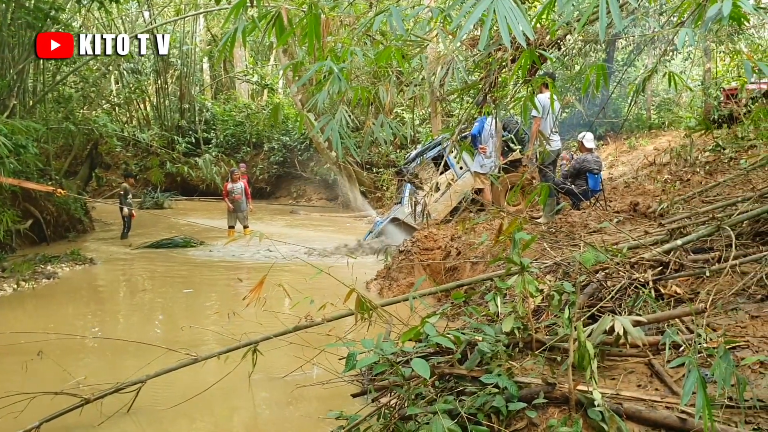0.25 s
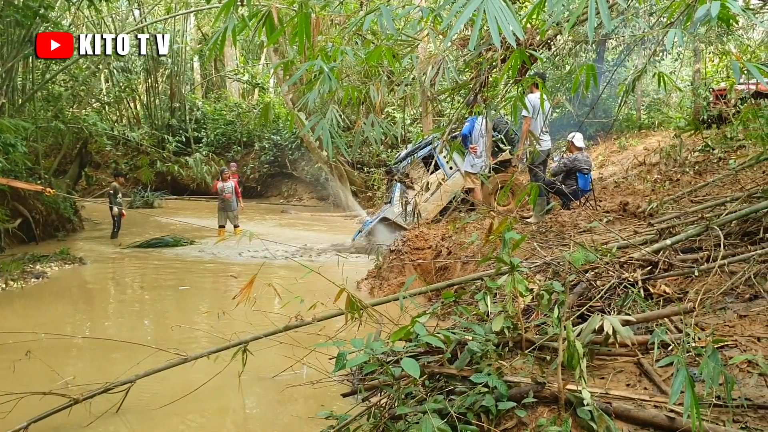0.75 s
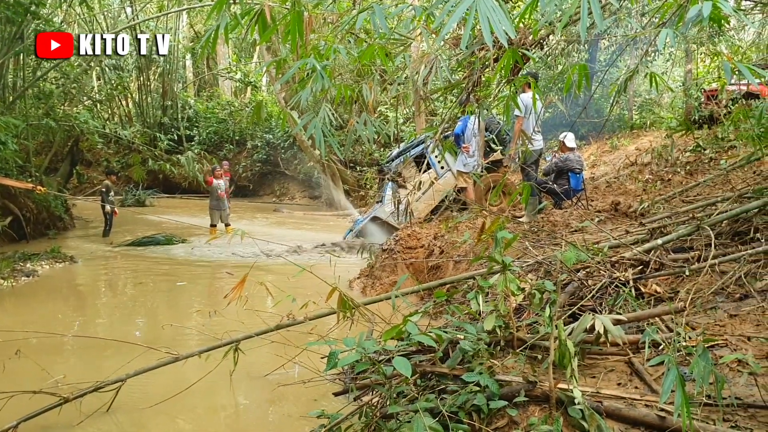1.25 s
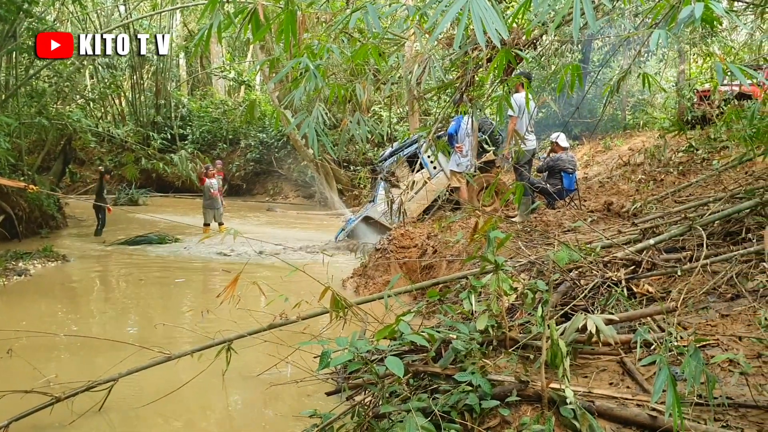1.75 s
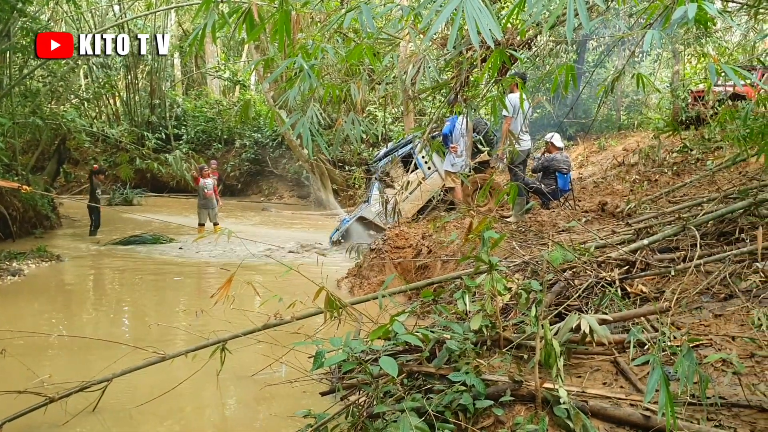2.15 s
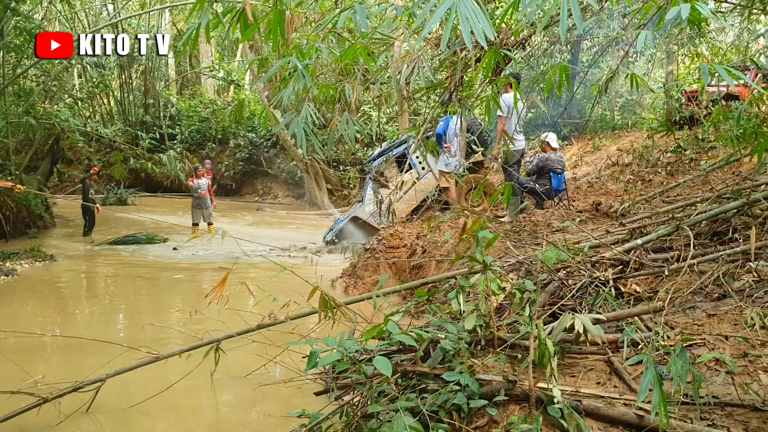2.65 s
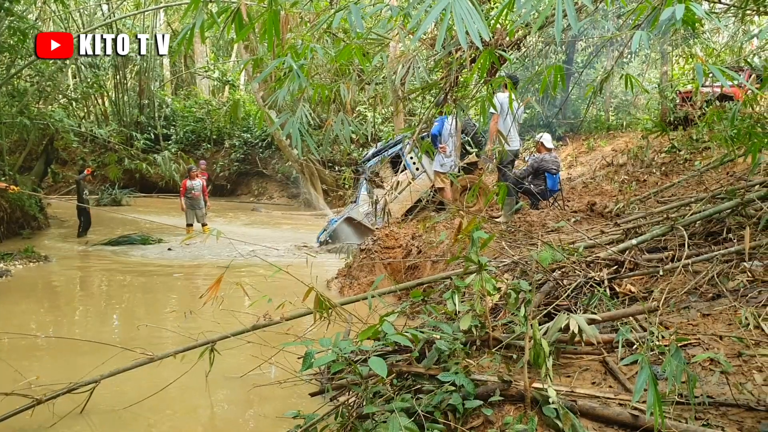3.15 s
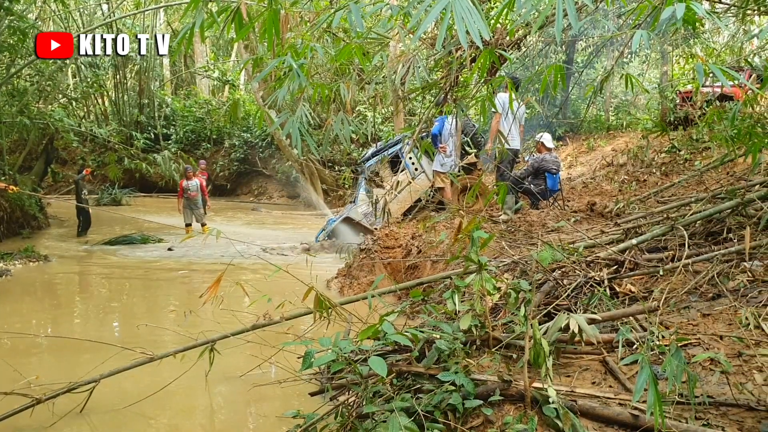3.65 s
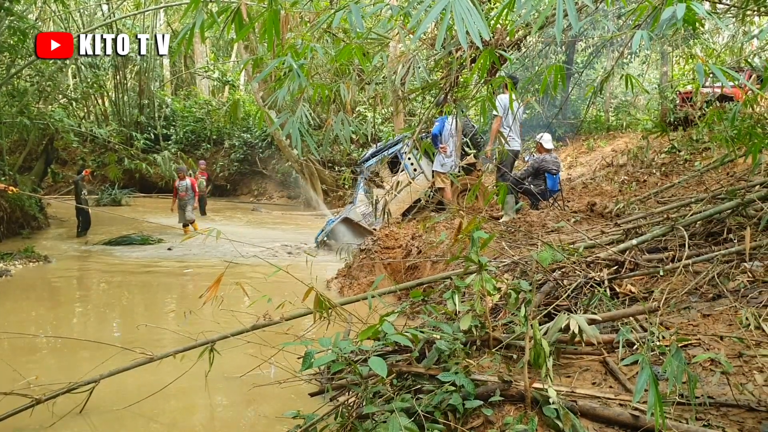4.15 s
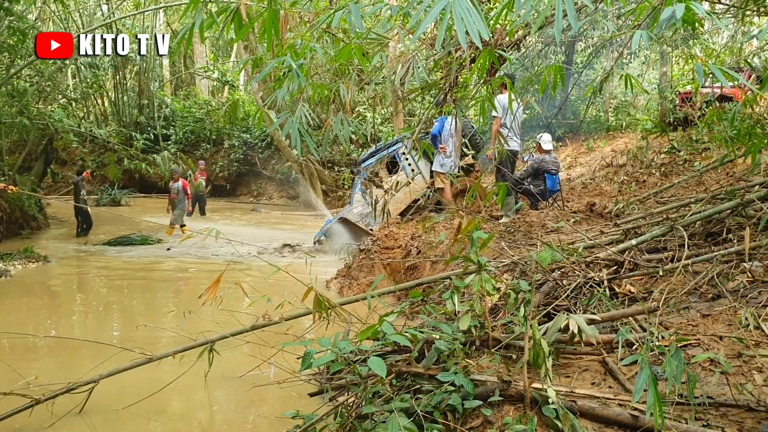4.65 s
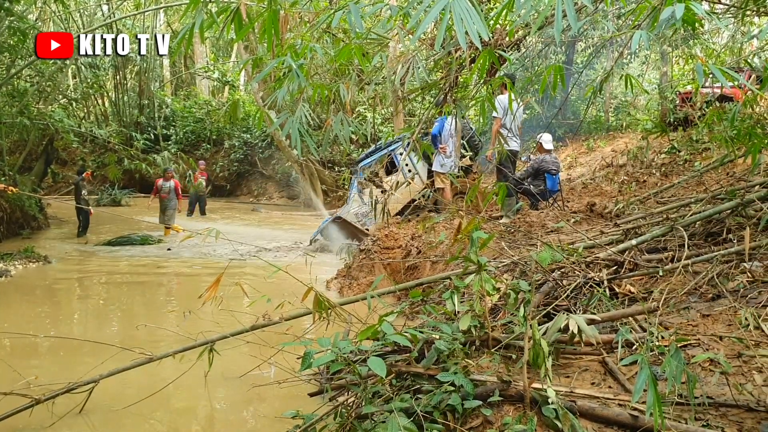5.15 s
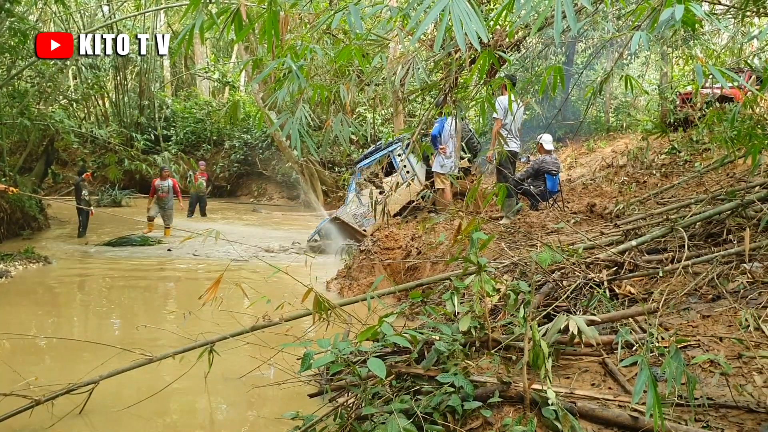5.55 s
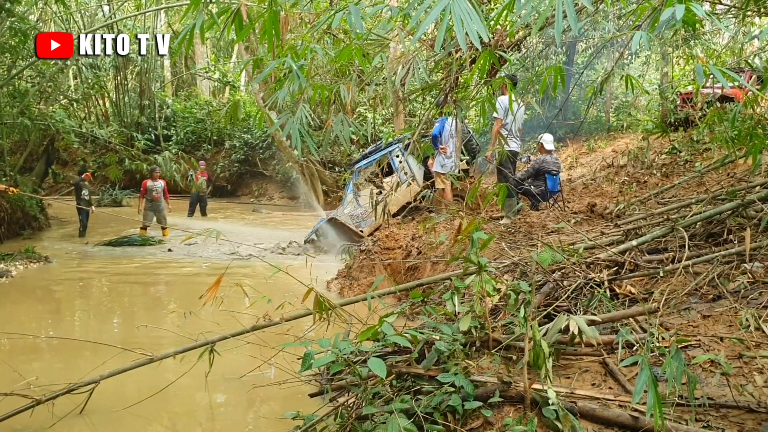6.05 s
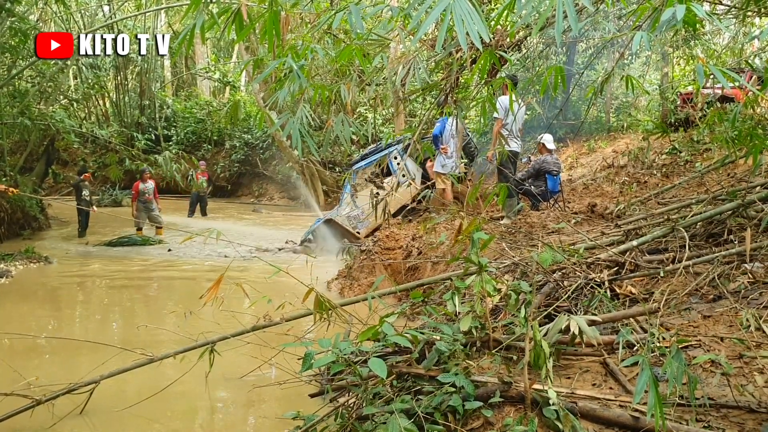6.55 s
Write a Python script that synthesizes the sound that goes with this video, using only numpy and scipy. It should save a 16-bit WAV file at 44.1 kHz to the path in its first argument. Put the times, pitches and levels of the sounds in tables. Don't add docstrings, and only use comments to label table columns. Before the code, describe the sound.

A four-cylinder diesel off-roader labours at high revs on a muddy bank, sags mid-way and recovers, wheels hissing spray into water.

```python
import sys
import numpy as np
from scipy import signal
from scipy.fft import rfft, irfft
from scipy.io import wavfile
from scipy.ndimage import uniform_filter1d, map_coordinates

SR = 44100
rng = np.random.default_rng(int(sys.argv[2]) if len(sys.argv) > 2 else 0)


def to_wav(s):
    ch = np.atleast_2d(s).T
    pcm = np.round(np.clip(ch, -1, 1) * 32767)
    wavfile.write(sys.argv[1], SR, pcm.astype(np.int16))


def rack_gain(trim_db):
    fader = np.asarray(trim_db, float)
    return 10 ** (fader / 20)


N = 299880


def curve(table):
    s, value = np.transpose(table)
    return np.interp(np.arange(N) / SR, s, value)


def at(table, hz):
    f, v = np.transpose(table)
    return np.interp(np.log(np.maximum(hz, 1)), np.log(np.maximum(f, 1)), v)


def walk(rate):
    hold = int(SR / rate)
    steps = np.repeat(rng.standard_normal(N // hold + 1), hold)
    return 1.29 * uniform_filter1d(uniform_filter1d(steps, hold), hold)[:N]


def per_firing(values, cycles):
    return map_coordinates(values, [cycles], order=2, mode="wrap")


def resonance_db(hz, modes):
    return sum(db / (1 + (2 * (hz - centre) / width) ** 2) for centre, width, db in modes)


def coloured(grains, spectrum, band, flicker_db, rate, modes=()):
    # (frequency [Hz], correlation)
    likeness = [(30, .96), (125, .99), (250, .8), (500, .86), (1000, .05), (4000, .15), (12000, -.1)]
    # (frequency [Hz], level [dB])
    tilt = [(30, 0), (60, -2.5), (400, 2.5), (1290, -0.5), (2380, 0), (4400, -4), (8120, -2.5), (15000, -1)]
    hz = np.fft.rfftfreq(N, 1 / SR)
    like = np.clip(at(likeness, hz), -1, 1)
    colour_db = at(spectrum, hz) + resonance_db(hz, modes)
    mid, side = rfft(grains) * rack_gain(colour_db) * np.sqrt([1 + like, 1 - like])
    pair = np.array([mid + side, mid - side]) * rack_gain(np.outer([.5, -.5], at(tilt, hz)))
    inside = (hz > band[0]) & (hz < band[1])
    pair /= np.sqrt(2 * np.sum(abs(mid[inside]) ** 2)) / N
    place = 2 * np.log2(np.maximum(hz, 1) / 30)
    noise = np.zeros((2, N))
    for k in range(19):
        overlap = np.clip(1 - abs(place - k), 0, 1)
        noise += irfft(pair * overlap, N) * rack_gain(flicker_db * walk(rate))
    return noise


def river():
    # (frequency [Hz], density [dB per Hz])
    patter = [(500, -6.5), (1200, -2.5), (2000, -20), (2750, -4.5), (3500, -8), (6000, -17), (9000, -26)]
    grains = rng.standard_normal((2, N))
    return rack_gain(-47.5) * coloured(grains, patter, (2200, 3500), flicker_db=0.92, rate=3.85)


def spray(cycles, db):
    # (frequency [Hz], density [dB per Hz])
    hiss = [(700, -5), (1200, -7), (1900, -3.5), (2700, -5), (3600, -10), (6500, -13), (7800, -17.5),
            (12000, -20), (15600, -27.5)]
    size = rack_gain(1.6 * np.minimum(rng.exponential(size=(2, N)), 6))
    pulse = 1 + 0.17 * np.cos(2 * np.pi * cycles + 0.94)
    grains = pulse * size * rng.standard_normal((2, N))
    return rack_gain(db - 3.5) * coloured(grains, hiss, (5000, 14000), flicker_db=0.63, rate=12)


def roar(cycles, db, rumble_db):
    # (frequency [Hz], density [dB per Hz])
    gas_spectrum = [(20, -53), (35, -28), (60, -17), (100, -16), (150, -19.5), (250, -17.5), (400, -21.5),
                    (700, -23.5), (1100, -22), (1700, -31), (2300, -40.5), (4500, -35.5), (7000, -43.5),
                    (9000, -73)]
    # (frequency [Hz], width [Hz], height [dB])
    body_modes = [(717, 37, 4), (1160, 130, 2.5), (1450, 67, 6), (1650, 53, 7.5), (1875, 190, 9),
                  (2240, 80, -6)]
    puff = np.exp(-(cycles % 1) / .4)
    pulse = 1 + 0.65 * puff + 0.087 * np.cos(np.pi * cycles) + 0.023 * np.cos(np.pi * cycles / 2)
    grains = pulse * rng.standard_normal((2, N))
    gas = coloured(grains, gas_spectrum, (800, 2200), flicker_db=0.98, rate=6, modes=body_modes)
    bass = signal.sosfiltfilt(signal.butter(2, 380, fs=SR, output="sos"), gas)
    return rack_gain(db - 6.0) * (gas + (rack_gain(rumble_db) - 1) * bass)


def block(cycles, crank_db, rings_db):
    # (multiple of the firing rate, level [dB])
    crank_tones = [(.5, -44), (1.5, 0), (2.5, -1.5), (3.5, -8), (4.5, -12), (5.5, -13), (6.5, -14.5)]
    turn = 2 * np.pi * cycles
    crank = sum(rack_gain(crank_db + db + 3 * walk(5)) * np.sin(k * turn) for k, db in crank_tones)
    ring = np.zeros(N)
    for k, db in enumerate(rings_db, 6):
        ring += rack_gain(db + 1.5 * walk(9)) * np.sin(k * turn + .8 * walk(10))
    return np.sqrt(2) * (crank + rack_gain(1.0) * ring)


def pipe(hz, load_db, climb, multiple):
    # (frequency [Hz], width [Hz], height
    # [dB])
    tone_modes = [(82.2, 3.89, -2.5), (98.9, 21.7, 13), (163.4, 19.95, -11.5), (173.1, 46.6, 20.5),
                  (206.9, 23, 15), (229.5, 7.1, 3.5), (257.2, 12.7, 10), (268, 4.7, -5.5),
                  (306.6, 39, 18.5), (337.7, 5.6, -11), (350.8, 19.2, 11.5), (370.14, 16.3, 10.5),
                  (401, 23, 20), (447, 37, 13.5),
                  (528, 12, 12.5), (569, 13, 18), (591, 18.6, 21), (606, 6, 8), (714.5, 53, 19.5),
                   (779, 14, 15.5), (807, 14, 13), (838, 8, 24)]
    # (load [dB per dB], climbing revs [dB per Hz/s])
    answer = [(1.19, 0.06), (2, 0.07), (0.27, 0.1251), (1.13, 0.2278), (3, 0.1445), (2.5, 0.027)]
    tone_hz = multiple * hz
    slope_db = -25 - 12 * np.log2(tone_hz / 100)
    per_load, per_climb = answer[min(multiple, len(answer)) - 1]
    driver_db = per_load * load_db + per_climb * climb
    return slope_db + resonance_db(tone_hz, tone_modes) + driver_db


def exhaust(cycles, hz, tones_db, roar_db, uneven):
    cylinders = [.9, .35, -1.2, -.05]
    # (firing rate [Hz], phase [rad])
    slant = [(75, 1), (89, .6), (94, .8), (97, 1.6), (102, 2.5)]
    # (frequency [Hz], level against the roar [dB])
    upper_tones = [(500, -21), (720, -21), (1000, -23), (1420, -20), (1900, -25)]
    count = int(cycles[-1]) + 8
    strength_scatter, timing_scatter = rng.standard_normal((count, 2)).T
    strength = per_firing(np.resize(cylinders, count), cycles) + .6 * per_firing(strength_scatter, cycles)
    angle = 2 * np.pi * (cycles + 0.018 * uneven * per_firing(timing_scatter, cycles))
    lead = at(slant, hz)
    low = sum(rack_gain(db) * np.sin(k * angle + lead * (k - 1)) for k, db in enumerate(tones_db, 1))
    high = np.zeros(N)
    for k in range(6, 19):
        level_db = roar_db + at(upper_tones, k * hz) + 3.5 * walk(6)
        high += rack_gain(level_db) * np.sin(k * angle + 2.5 * walk(9))
    return np.sqrt(2) * (1 + uneven * strength) * (low + high)


def inertia(v):
    return uniform_filter1d(v, size=SR // 10, mode="nearest")


def scene():
    # (time [s], firing rate [Hz])
    revs = [(0, 103.3), (.44, 103.2), (.95, 102.2), (1.25, 97.5), (1.56, 98.7), (1.77, 95.65),
            (2.23, 85.95), (2.52, 75.84), (2.7, 77.2), (3.06, 86.37), (3.35, 91.85), (3.9, 85.67),
            (4.35, 90.33), (4.72, 90.5), (5.22, 86.85), (5.71, 86.62), (6.23, 92.4), (6.8, 94.14)]
    # (time [s], engine load against full [dB])
    load = [(0.0, -0.76), (0.68, -1.2), (0.93, -0.7), (1.11, -4.5), (1.34, -2.5), (2.07, -4.5),
            (2.41, -6.5), (2.56, -7.5), (2.93, -1), (3.25, -0.6), (3.7, -3), (4.17, -0.9), (4.6, 0),
            (5.04, 0), (5.56, -1.8), (5.94, -0.2), (6.22, 0), (6.8, -1.4)]
    # (time [s], spray level [dB])
    wheels = [(0, -43.5), (.93, -43.5), (1.12, -46), (1.48, -43), (1.87, -47), (2.4, -43), (2.65, -46),
              (2.9, -41), (3.1, -38.5), (3.35, -39.5), (3.5, -42), (3.9, -42), (4.3, -40), (5, -42),
              (6.06, -40.5), (6.8, -44)]
    hz, load_db = inertia(curve(revs)), inertia(curve(load))
    climb = inertia(np.gradient(hz) * SR)
    eased_db = np.maximum(-load_db, 0)
    cycles = np.cumsum(hz) / SR

    roar_db = -29 + load_db + 0.0753 * climb
    gas = roar(cycles, roar_db, rumble_db=0.5 + 1.44 * eased_db)

    tones_db = [pipe(hz, load_db, climb, multiple=k) for k in range(1, 10)]
    crank_db = -37.5 + 1.55 * eased_db - 1.18 * abs(hz - 88.5) + 0.1661 * climb
    body = block(cycles, crank_db, tones_db[5:])

    slow = np.clip((100 - hz) / 10, 0, 1)
    uneven = np.minimum(.04 + .045 * eased_db * slow, .27)
    hum = exhaust(cycles, hz, tones_db[:5], roar_db, uneven)

    left = rack_gain(-.4) * (np.roll(hum, 4) + np.roll(body, 6))
    right = rack_gain(.4) * (hum + body)
    return river() + spray(cycles, curve(wheels) + 2.1) + gas + np.array([left, right])


def top_cut(x):
    return signal.sosfilt(signal.butter(12, 15790, fs=SR, output="sos"), x)


def record(dry):
    return top_cut(dry)


dry = scene()
out = record(dry)
to_wav(out)
```